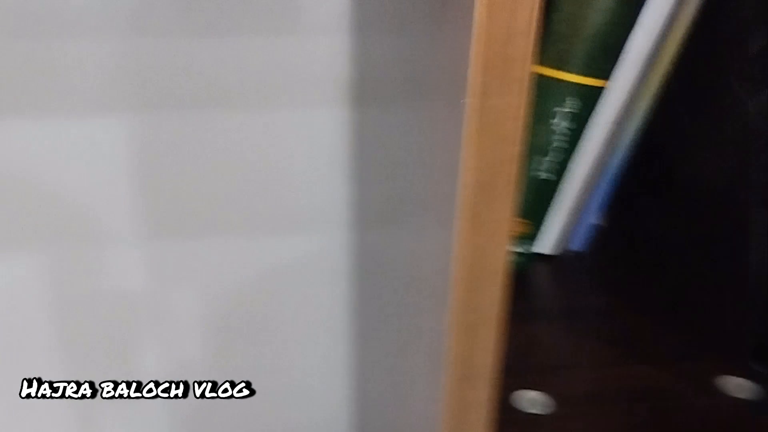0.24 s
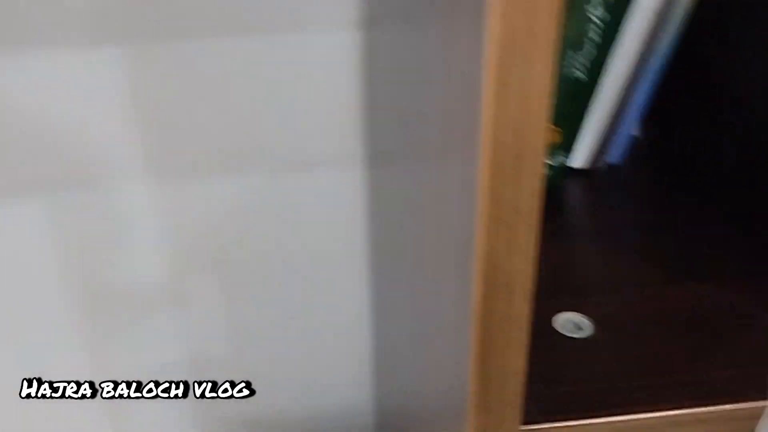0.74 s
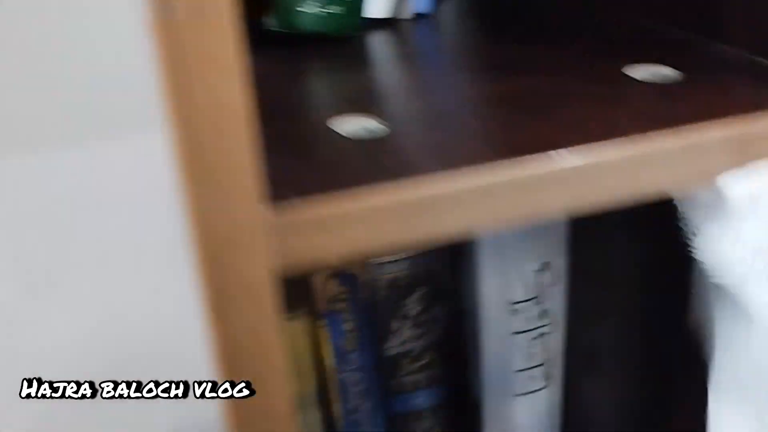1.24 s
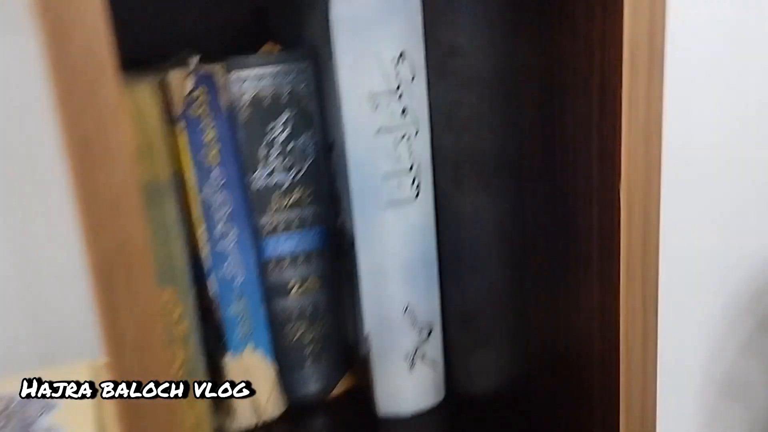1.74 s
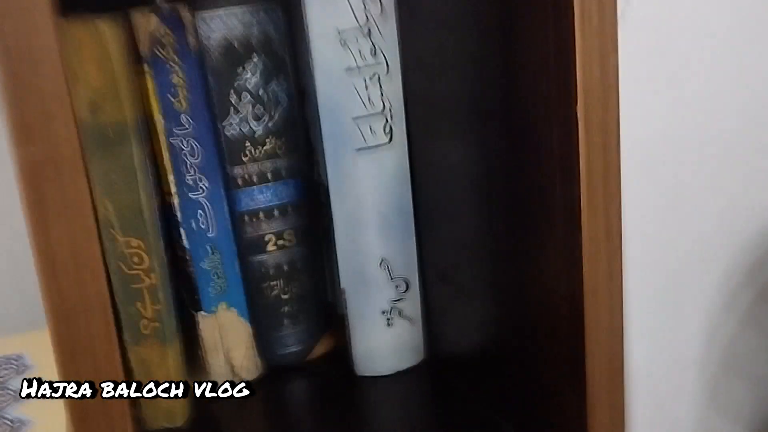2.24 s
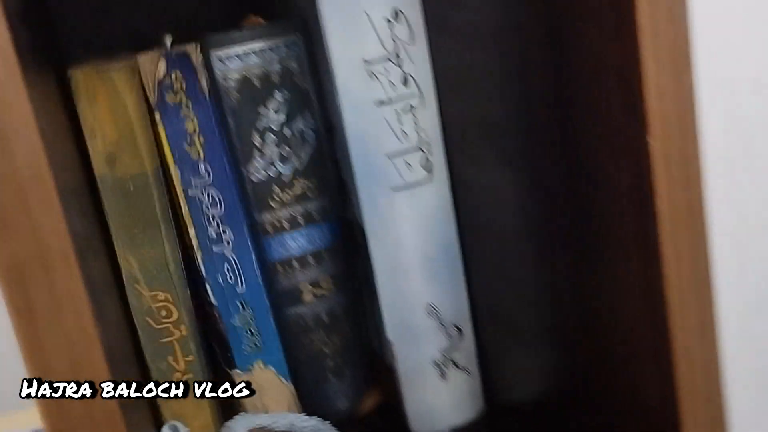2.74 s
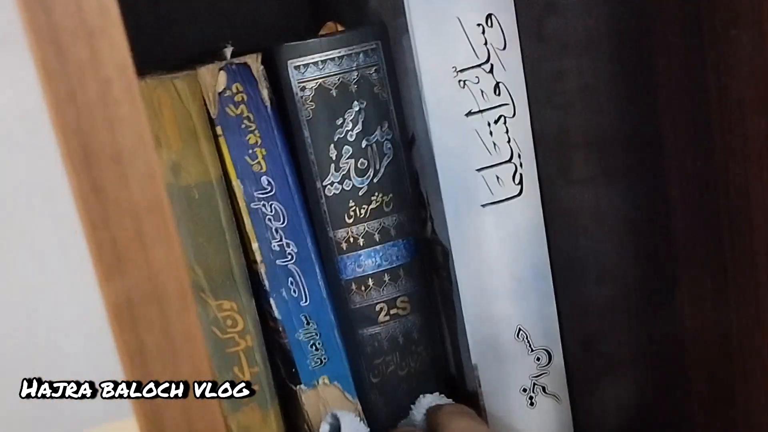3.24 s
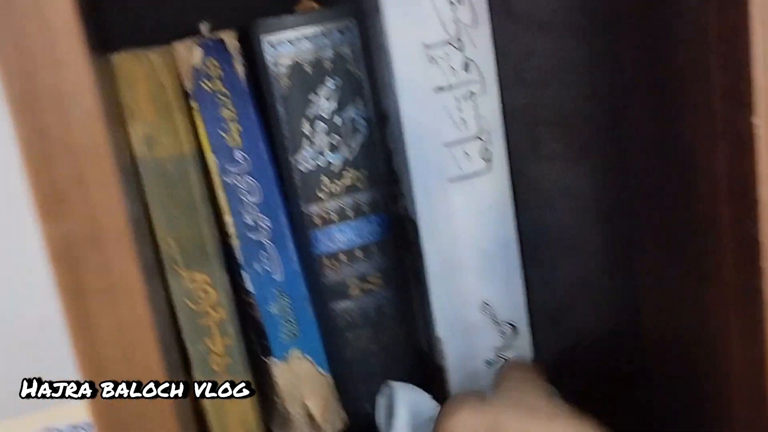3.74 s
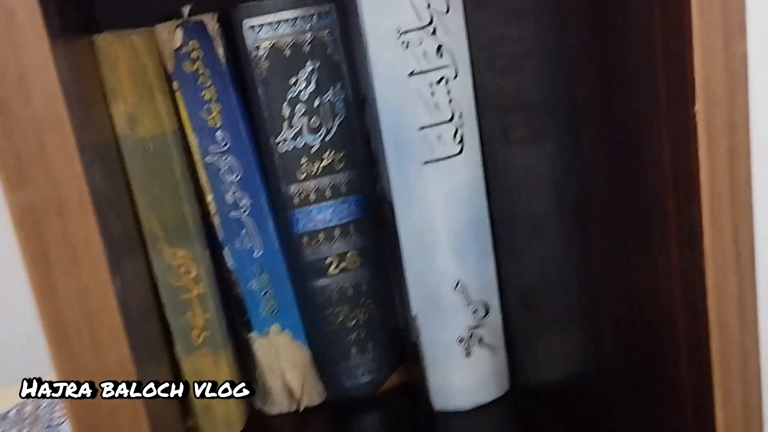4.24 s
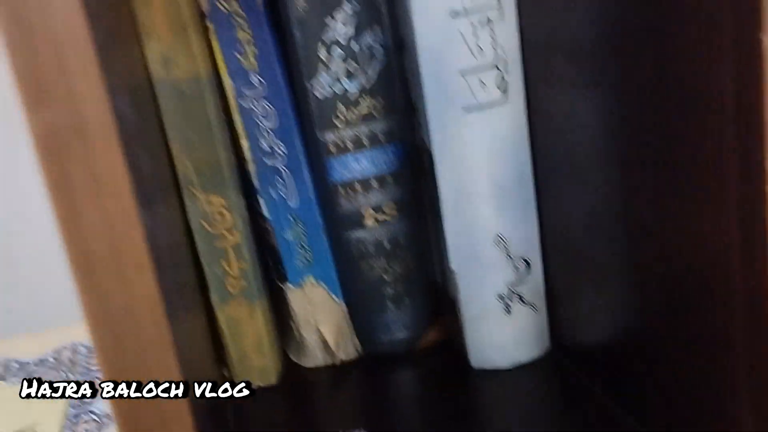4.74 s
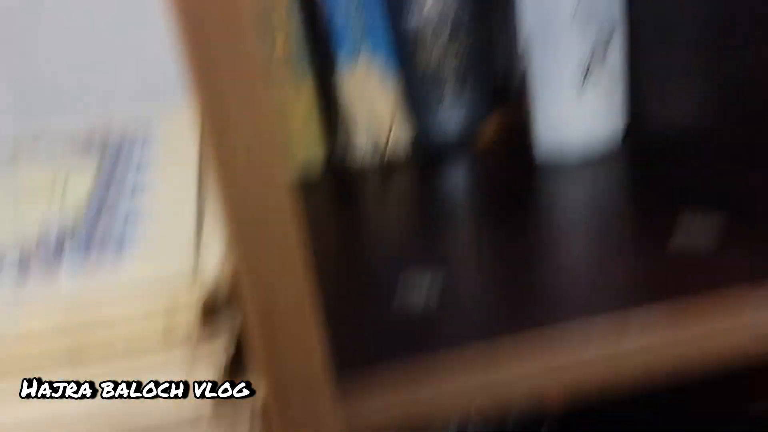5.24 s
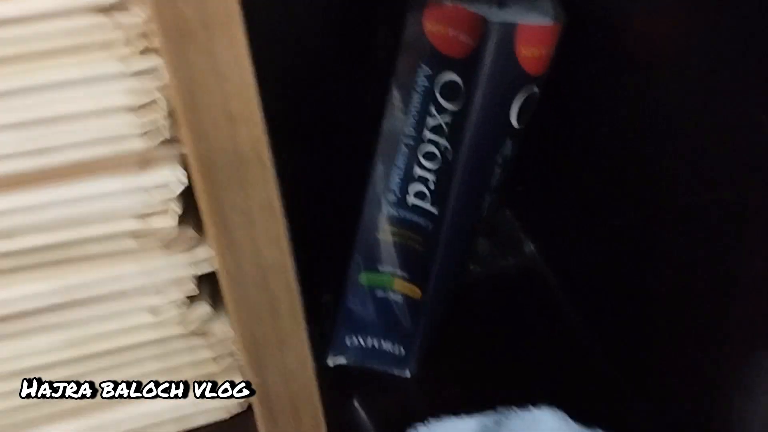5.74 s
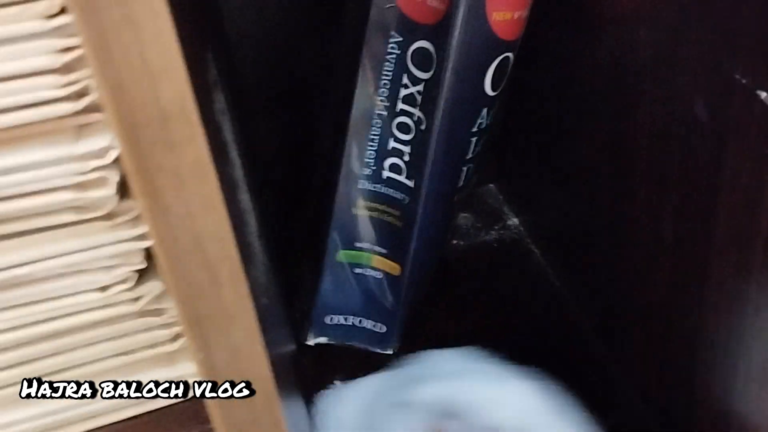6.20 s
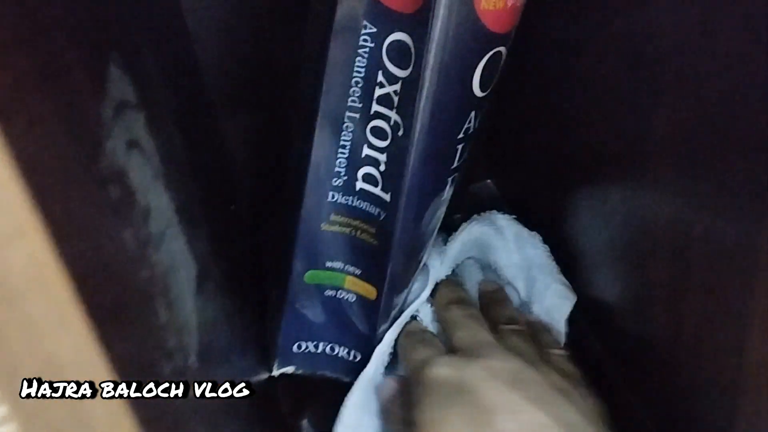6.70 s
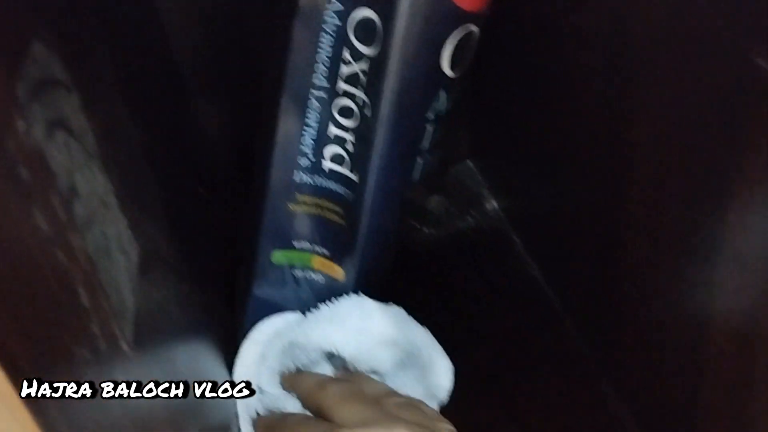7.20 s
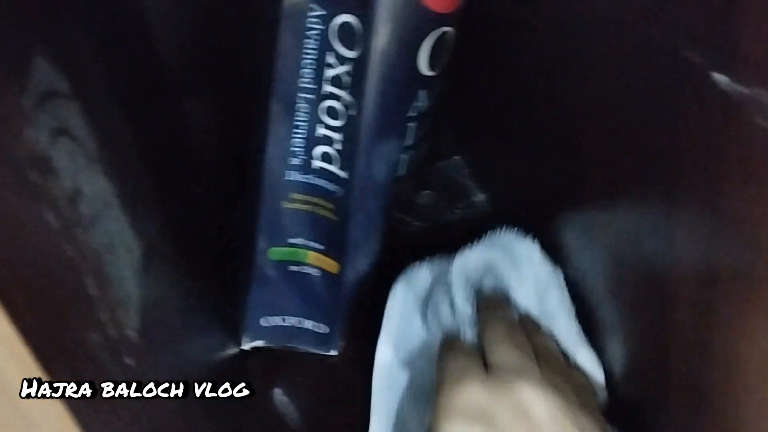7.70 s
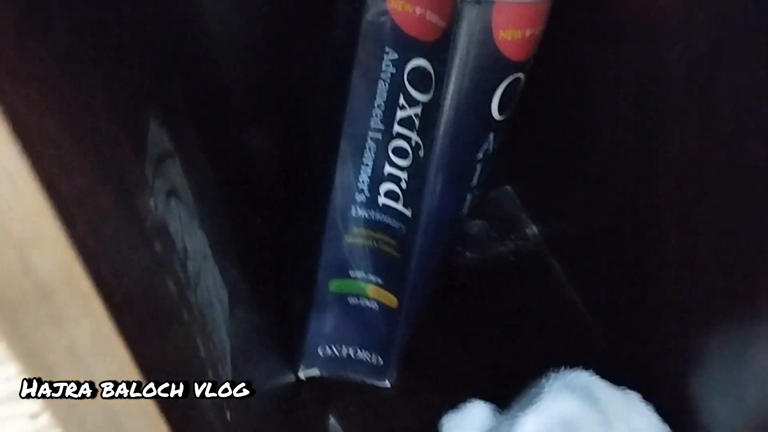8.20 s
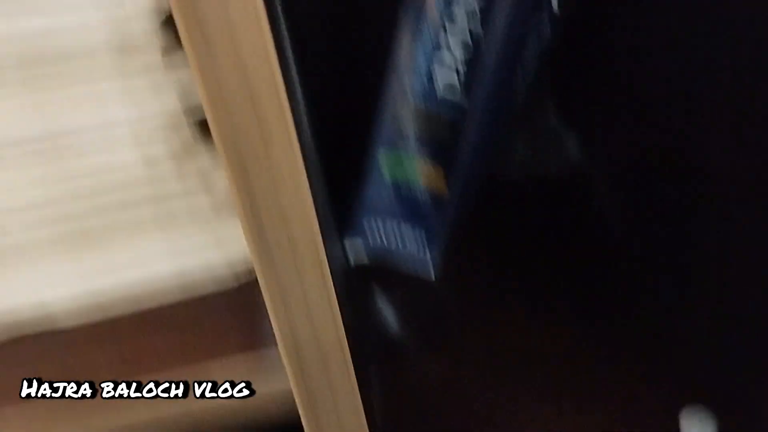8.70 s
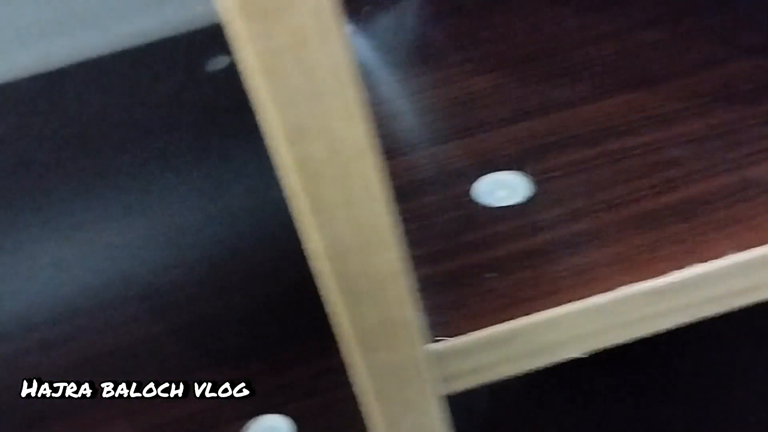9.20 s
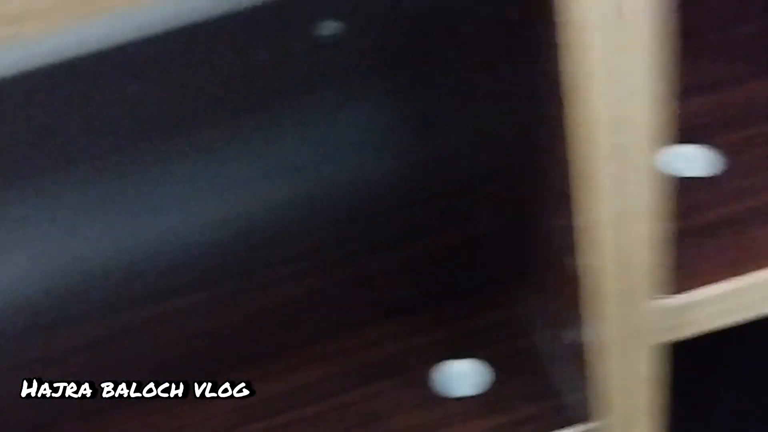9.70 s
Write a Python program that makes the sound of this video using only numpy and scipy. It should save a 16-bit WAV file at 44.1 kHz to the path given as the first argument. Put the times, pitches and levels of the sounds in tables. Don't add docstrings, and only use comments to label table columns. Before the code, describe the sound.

A cabinet door slaps twice in the first second, with a steel catch snapping, then knuckles hit a wooden side panel very hard. After that a cloth wipes the shelves in short, uneven hissing strokes, with soft padded thuds and faint knocks. Close hand-held phone in a small quiet room, low rumble and small air puffs on the microphone.

```python
import sys
import numpy as np
from scipy import signal
from scipy.fft import rfft, irfft, next_fast_len
from scipy.io import wavfile
from scipy.ndimage import uniform_filter1d, map_coordinates

SR = 44100
rng = np.random.default_rng(int(sys.argv[2]) if len(sys.argv) > 2 else 0)


def boost(x):
    u = np.asarray(x, float) / 20
    return 10 ** u


def master_out(mix):
    frames = np.transpose(np.atleast_2d(mix))
    ceiling = np.clip(frames, -1, 1)
    pcm = np.round(ceiling * 32767).astype(np.int16)
    wavfile.write(sys.argv[1], SR, pcm)


N = 438794


def unit(x):
    return x / np.sqrt(np.mean(x ** 2) + 1e-20)


def along(points, hz):
    f, v = np.transpose(points)
    return np.interp(np.log(hz + 1), np.log(f + 1), v)


def wobble(rate, order=3):
    knots = rng.standard_normal(int(N * rate / SR) + 4)
    return map_coordinates(knots, [np.arange(N) * rate / SR], order=order)


def filtered(x, response):
    n = x.shape[-1]
    m = next_fast_len(n + 8192)
    return irfft(rfft(x, m) * response(np.fft.rfftfreq(m, 1 / SR)), m)[..., :n]


def resonance(f, centre, width):
    return 1j * f * width / (centre * centre - f * f + 1j * f * width)


def split_angle(alike, hz):
    return np.arccos(np.clip(along(alike, hz), -1, 1)) / 2


def rush(spectrum, alike, patchy_db, grit_db=0):
    raw = rng.standard_normal((2, N)) * boost(grit_db * wobble(970, order=1))
    z = signal.stft(raw, nperseg=512)[2]
    field = rng.standard_normal(z.shape[1:])
    for axis in (0, 1):
        field = uniform_filter1d(field, size=8, axis=axis)
    pair = signal.istft(z * boost(patchy_db * unit(field)), nperseg=512)[1][:, :N]

    def colour(hz):
        angle = split_angle(alike, hz)
        return boost(along(spectrum, hz)) * [np.cos(angle), np.sin(angle)]

    mid, side = filtered(pair, colour)
    return unit(np.array([mid + side, mid - side]))


def add(track, s, sound):
    i = round(s * SR)
    track[:, i:i + sound.shape[1]] += sound[:, :N - i]


def later(pair, count):
    return np.array([pair[0], np.roll(pair[1], count)])


# (frequency [Hz], time to fall 60 dB [s])
ROOM_DECAY = [(100, 0.32), (500, 0.24), (2000, 0.22), (6000, 0.15), (14000, 0.1)]
# (frequency [Hz], likeness [-1 to 1])
ROOM_ALIKE = [(60, 0.73), (240, 0.81), (950, -0.42), (3770, 0.16), (15000, -0.44)]


def with_room(sound, wet_db):
    hz, t, (a, b) = signal.stft(rng.standard_normal((2, SR // 4)), SR, nperseg=256)
    angle = split_angle(ROOM_ALIKE, hz)[:, None]
    mid, side = np.cos(angle) * a, np.sin(angle) * b
    z = np.array([mid + side, mid - side])
    tail = signal.istft(z * boost(-60 * t / along(ROOM_DECAY, hz)[:, None]), SR, nperseg=256)[1]
    tail *= 1 - np.exp(-np.arange(tail.shape[1]) / SR / 0.0053)
    tail *= np.linspace(1, 0, tail.shape[1])
    wet = signal.fftconvolve(sound, tail / np.linalg.norm(tail[0]), axes=1)
    return np.pad(sound, ((0, 0), (0, tail.shape[1] - 1))) + boost(wet_db) * wet


# (start [s], length [s], first speed
# [dB], last speed [dB], pressure on the board re speed [dB])
FREE_STROKES = [(.11, .13, -68.5, -65, 15), (.282, 0.14, -50.5, -69.5, -1.5), (.45, 0.3, -78.5, -63.5, 4),
                (.778, 0.14, -63, -62, 1), (1.0, 0.13, -69, -66.5, 1), (1.105, 0.047, -60.5, -56, 2),
                (1.2, 0.082, -66.5, -64.5, 13), (1.3, 0.056, -70.5, -61, 17.5), (1.45, 0.35, -66.5, -75, 4),
                (1.67, 0.22, -84, -62, 9), (1.97, 0.29, -67, -71.5, 15), (2.2, 0.25, -76, -66.5, 6.5)]
SHELF_STROKES = [(2.5, 0.19, -60, -60.5, 11.1), (2.708, .025, -55, -54.5, 8.1), (2.74, .03, -59, -58, 6),
                 (2.82, 0.016, -52.5, -58.5, 3.2), (2.782, 0.025, -50.5, -54, 5.2),
                 (2.96, 0.2, -58.5, -72, 5.8), (3.15, 0.088, -71, -83, 3), (3.285, 0.13, -65, -62, 8.8),
                 (3.53, 0.062, -67.5, -62, 6.9), (3.77, 0.24, -68, -56.5, 5.1),
                 (4.15, 0.14, -56.5, -56, 4.1), (4.46, 0.059, -71, -69, 17.3),
                 (4.57, 0.093, -61, -59.5, 5.7), (4.74, 0.095, -57, -57.5, 4.4),
                 (4.95, .11, -68, -58.5, 15.5),
                 (5.56, 0.19, -74, -71.5, 6.3), (5.88, 0.06, -67, -59, 5), (6.02, 0.081, -74, -66.5, 5.4),
                 (6.14, 0.1, -61, -58, 8.1), (6.3, .04, -67.5, -69, 8), (6.376, 0.21, -54.5, -68.5, 8.2),
                 (6.61, 0.051, -61, -56.5, 12.5), (6.72, 0.26, -63.5, -59.5, 7),
                 (7.0, 0.21, -64.5, -65.5, 5.5), (7.29, 0.14, -61, -59, 5.1),
                 (7.449, 0.15, -61.5, -68.5, 6.6), (7.64, 0.13, -60.5, -70.5, 7.7),
                 (7.9, 0.14, -61, -57, 4), (8.08, 0.12, -63.5, -64, 8.3), (8.221, 0.11, -67, -53.5, 7.5),
                 (8.37, 0.057, -58, -56.5, 9.4), (8.58, .17, -73.5, -69.5, 6.4), (8.78, 0.15, -67, -80, 12),
                 (9.0, 0.087, -68, -65, 5.4), (9.1, 0.15, -72, -77.5, 9.1), (9.3, 0.098, -73, -65.5, 14),
                 (9.465, 0.079, -63, -58, 6.1), (9.62, 0.15, -67, -67.5, 5.8),
                 (9.8, 0.097, -64.5, -64, 12.4)]


def strokes():
    start_db_per_s, stop_db_per_s, lifted_db = 201, 350, -89
    nap_free_db, nap_shelf_db, nap_grows = -9, -9, 1.05
    t = np.arange(0, N / SR + .01, .002)
    speed, nap, press = np.full((3, len(t)), float(lifted_db))
    for table, nap_db in (FREE_STROKES, nap_free_db), (SHELF_STROKES, nap_shelf_db):
        for s, length, first_db, last_db, press_db in table:
            db = np.interp(t, [s, s + length], [first_db, last_db])
            db = db - start_db_per_s * np.maximum(s - t, 0)
            db = db - stop_db_per_s * np.maximum(t - s - length, 0)
            speed = np.maximum(speed, db)
            press = np.maximum(press, db + press_db)
            nap = np.maximum(nap, -62 + nap_grows * (db + 63.0) + nap_db)
    return [np.interp(np.arange(N) / SR, t, curve) for curve in (speed, nap, press)]


def panel(modes, damping):
    def response(f):
        return sum(boost(db) * resonance(f, hz, damping * np.log(1000) / np.pi / t60) for hz, db, t60 in modes)

    return response


SHELF_CHANGES = [2.1, 5.3, 9.3]
# (frequency [Hz], level per Hz [dB])
SCRAPE_COLOUR = [(240, -37), (400, -10.5), (590, -6), (721, -4.5), (828, -8.5), (1180, -11), (1900, -11.5),
                 (2400, -13), (5290, -15), (8000, -39.5), (10400, -69), (17600, -120)]
# (frequency [Hz], level per Hz [dB])
NAP_COLOUR = [(3500, -23), (6000, 2.5), (9000, 0), (16000, -10)]
# (frequency [Hz], likeness [-1 to 1])
CLOTH_ALIKE = [(60, .9), (600, 1), (1500, 0.94), (3500, 0.57), (8000, .05), (15000, .05)]
# (frequency [Hz], width [Hz], level [dB])
OVERTONES = [(1290, 48, -1), (1657, 38, -2), (3900, 140, -9)]


def cloth():
    scrape_db, nap_db, drum_db = strokes()
    flutter = wobble(22)

    def overtones(f):
        return 1 + sum(boost(db + 0.5) * resonance(f, hz, width) for hz, width, db in OVERTONES)

    scrape = rush(SCRAPE_COLOUR, CLOTH_ALIKE, patchy_db=1.5, grit_db=1.5)
    scrape *= boost(scrape_db + .7 * flutter) * boost(0.73 * wobble(160, order=1))
    scrape = boost(-1.5) * filtered(scrape, overtones)

    nap = boost(nap_db + .8 * flutter) * rush(NAP_COLOUR, CLOTH_ALIKE, patchy_db=1.0, grit_db=1.0)

    slip_colour = [(60, 2.5), (300, 1.0), (800, -9.0), (1000, -16.0), (2000, -31.5)]  # (Hz, dB)
    slips = rush(slip_colour, [(200, 1.0), (900, 0.32)], patchy_db=4.0) * boost(0.87 * wobble(45))
    place = np.searchsorted(SHELF_CHANGES, np.arange(N) / SR)
    panels = [panel(FRAME_MODES[1:], damping=1.9), panel(UPPER_MODES[1:], damping=1.0),
              panel(LOWER_MODES[1:], damping=2.3), panel(FRAME_MODES[1:], damping=2.9)]
    boards = np.zeros((2, N))
    for k, response in enumerate(panels):
        here = place == k
        boards += unit(filtered(slips * here, response)) * np.sqrt(np.mean(here))
    return scrape + nap + boost(drum_db - 2.5) * boards


def sweeping(pair, samples):
    late = np.round(samples * np.tanh(1.2 * wobble(2.2))).astype(int)
    return np.array([pair[0], pair[1][np.clip(np.arange(N) - late, 0, N - 1)]])


def knocks(table, modes, colour, wet_db, crack_s, scuff, lag_s, pan_db, count):
    out, t = np.zeros((2, N)), np.arange(SR // 7) / SR
    for s, db, over_db, crack_db, carcass_db in table:
        ring = np.zeros(len(t))
        for hz, level, t60 in modes:
            part_db = carcass_db if hz < 170 else 0 if hz < 420 else over_db
            pitch = hz * (1 + 0.017 * rng.normal())
            build = 1 - np.exp(-t * hz / 0.85)
            ring += boost(part_db + level - 60 * t / t60) * np.sin(2 * np.pi * pitch * t) * build
        shared, *own = filtered(rng.standard_normal((3, len(t))), lambda f: boost(along(colour, f)))
        fade = boost(-60 * t / crack_s) + scuff * boost(-60 * t / 0.077)
        crack = (shared + 1.1 * np.array(own)) * fade
        crack *= boost(crack_db + 5.0) / np.abs(crack).max()
        pan = pan_db * np.array([[.5], [-.5]])
        add(out, s + lag_s, with_room(boost(db - 5.5 + pan) * (ring + crack), wet_db))
    return later(out, count)


# (time [s], board peak level [dB],
# overtones re board [dB], # crack re board [dB], carcass re board [dB])
DOOR_KNOCKS = [(.073, -40, -23, -36, 3), (.187, -18, -20, -29.5, 3), (.2005, -17, 7.5, -6.5, -15.5),
               (.2065, -12, 0, 4, -8), (.713, -25.5, -11.5, -29, 8), (.764, -16, 0, -9, 14),
               (.768, -13.5, -6.5, -3, 0.5), (.775, -27, 0, -1.5, -1), (.786, -22.5, -6, -16, -1),
               (.8065, -7, -4.5, -6, 3), (.81, -4.5, -13, -15, 4), (.826, -16.5, -8.5, -20.5, 2),
               (1.344, -24, -11.5, -29, -0.5)]
# (frequency [Hz], level [dB], time to fall 60 dB [s])
DOOR_MODES = [(137, 6, 0.034), (127, -10.5, 0.13), (250, -5.5, 0.076), (300, 4, 0.028), (468, 1.5, 0.04),
              (770, -2.5, 0.02), (980, -8.5, .03), (1190, -14, 0.022), (2460, -19, 0.019)]
# (frequency [Hz], level [dB])
SLAP_COLOUR = [(300, -26.5), (800, -7), (1600, -12.5), (2400, -15), (3200, -10.5), (5200, -17), (8000, -18),
               (17000, -36)]


def door_knocks():
    return knocks(DOOR_KNOCKS, DOOR_MODES, SLAP_COLOUR, wet_db=-12.0, crack_s=0.028, scuff=0.13,
                  lag_s=0.001, pan_db=-2.5, count=-2)


# (time [s], board peak level [dB], overtones re board [dB],
# crack re board [dB], carcass re board [dB])
SIDE_KNOCKS = [
    (1.357, -37, -5, -2.5, -6.5),
    (1.3715, -20.5, -2, -11, -9),
    (1.376, -1, -15, -17, -15),
    (1.388, -16.5, 7.5, -8.5, -23),
    (1.419, -26.5, 1, -12, -3),
]
# (frequency [Hz], level [dB], time to fall 60 dB [s])
SIDE_MODES = [(154, -7, 0.12), (240, -4.5, .13), (268, -0.5, .07), (495, -7.5, 0.04), (745, -4, 0.05),
              (822, -17, 0.036), (940, -28, .04), (1127, -23, 0.032), (1594, -20, 0.019), (2830, -20, .02)]
# (frequency [Hz], level [dB])
RAP_COLOUR = [(300, -17), (700, 2), (1600, -7.5), (2800, -10.5), (5000, -14), (9000, -24), (17000, -43)]


def side_knocks():
    return knocks(SIDE_KNOCKS, SIDE_MODES, RAP_COLOUR, wet_db=-12.5, crack_s=0.023, scuff=0.33,
                  lag_s=.0006, pan_db=1.0, count=-4)


# (time [s], board peak level [dB], overtones re board [dB],
# crack re board [dB], carcass re board [dB])
UPPER_KNOCKS = [(2.467, -35, -22, -30, -15), (2.493, -28, -12.5, -11, -16), (2.706, -41.5, 3, -8, -14),
                (2.777, -42, 9, -15, -6), (2.796, -31.5, 2, -8, -4), (2.953, -52, 4, -5, -10),
                (4.24, -32, -8, -11, -7), (4.408, -60, 2, -2, -10), (4.452, -57, 4, -15, -12),
                (4.503, -38.5, -11, -13, -22), (4.569, -38, -23, -15, -14), (4.75, -31.5, -12, -18, -9),
                (4.803, -33, -14, -13, -24), (4.999, -36.5, -12, -12, -1), (5.022, -38, -21, -31, -12.5)]
# (frequency [Hz], level [dB], time to fall 60 dB [s])
UPPER_MODES = [(106, 0.5, 0.1), (196, -8.5, 0.089), (295, 4.5, 0.049), (305, -7.5, 0.017),
               (507, -2.5, 0.066), (735, 5, 0.04), (1230, -5, 0.018)]


def upper_knocks():
    return knocks(UPPER_KNOCKS, UPPER_MODES, RAP_COLOUR, wet_db=-9.0, crack_s=0.034, scuff=.2,
                  lag_s=0.00027, pan_db=1.0, count=5)


# (time [s], board peak level [dB], overtones re board [dB],
# crack re board [dB], carcass re board [dB])
LOWER_KNOCKS = [(5.6, -29, -17, -24, -1), (5.622, -27, 1, -10, 2), (5.644, -27.5, -6, -16, 2.5),
                (6.174, -30, -25, -17, -26), (6.371, -33.5, -23, -22, 3.5), (6.604, -50, 0, 0, -18),
                (6.626, -42, 2, 1.5, -17.5), (6.648, -43, 4, 4.5, -18), (6.964, -41, 1, -25, -12),
                (7.5525, -28, -7, -5, 0.5), (7.56, -35.5, 6, -16, -1), (7.5715, -28, -20, -29, -12),
                (7.665, -49, 9, 2, 4), (8.369, -42, 6, -2, -20), (8.443, -40, -2, -8, -17)]
# (frequency [Hz], level [dB], time to fall 60 dB [s])
LOWER_MODES = [(155, 1.5, 0.083), (236, -6.5, 0.11), (257, 0, 0.068), (490, -4.5, 0.032), (716, -6, 0.038),
               (1130, -16, 0.036)]


def lower_knocks():
    return knocks(LOWER_KNOCKS, LOWER_MODES, RAP_COLOUR, wet_db=-11.0, crack_s=0.029, scuff=0.85,
                  lag_s=.0006, pan_db=1.5, count=4)


# (time [s], board peak level [dB], overtones re board [dB],
# crack re board [dB], carcass re board [dB])
FRAME_KNOCKS = [
    (2.185, -44.5, 5.5, -2.5, -5.5),
    (2.839, -33.5, -10, -22, 4),
    (3.585, -32, -31, -27.5, 12.5),
    (8.744, -26.5, -13, -28, -1),
    (8.763, -26, -14, -27, 3),
    (8.788, -39, -2, -15, 8),
    (9.26, -48, 0, -19, 8),
    (9.323, -44, 4, -12, -10),
    (9.375, -36, -23, -17.5, 5),
    (9.888, -31.5, -17, -33, -13.5),
]
# (frequency [Hz], level [dB], time to fall 60 dB [s])
FRAME_MODES = [(153.5, -1.5, 0.046), (181, -7, 0.16), (334, 5, 0.017), (430, 9, 0.034), (620, 1, 0.065),
               (900, 2, 0.012)]


def frame_knocks():
    return knocks(FRAME_KNOCKS, FRAME_MODES, RAP_COLOUR, wet_db=-12.5, crack_s=0.024, scuff=.21,
                  lag_s=0.00054, pan_db=0.0, count=-5)


# (frequency [Hz], level [dB], time to fall 60 dB [s])
CATCH_MODES = [(3200, 2.5, 0.0042), (4090, -4.5, 0.005), (5080, 1, 0.0046), (2140, -6, 0.0074),
               (840, -7, 0.014)]


def catch():
    out, t = np.zeros((2, N)), np.arange(SR // 30) / SR
    ring = sum(boost(db - 60 * t / t60) * np.sin(2 * np.pi * hz * t) for hz, db, t60 in CATCH_MODES)
    level_db = -8.5 + np.array([[-2.5], [2.5]])
    add(out, .2078, with_room(boost(level_db) * ring, wet_db=-20.5))
    return later(out, count=-1)


# (start [s], length [s], peak level [dB], pitch [Hz])
THUDS = [(1.9895, 0.022, -27, 284), (2.009, 0.023, -33.5, 250), (2.035, 0.0097, -37, 222),
         (2.539, 0.032, -39.5, 320), (2.586, 0.03, -39.5, 330), (2.619, 0.021, -42.5, 317),
         (2.646, 0.021, -43, 323), (2.693, 0.011, -45, 300), (5.6235, 0.014, -18.5, 250),
         (5.637, 0.018, -26, 235), (5.652, 0.022, -34, 244), (5.699, 0.012, -48, 250),
         (5.727, 0.0076, -40, 200), (6.424, 0.022, -44, 250), (6.63, 0.0072, -39, 250),
         (6.643, .012, -42, 250), (6.673, 0.018, -39, 230), (7.414, 0.024, -45, 250),
         (7.915, .02, -48.5, 250), (8.272, 0.018, -48, 250), (8.367, 0.021, -29, 258),
         (8.433, 0.033, -29, 255), (9.4, 0.029, -42.5, 128.5), (4.16, 0.02, -44.5, 300),
         (4.479, 0.015, -49, 300), (7.569, 0.02, -35, 112), (7.585, .03, -42, 240),
         (8.763, 0.016, -36, 110), (0.314, 0.032, -42.5, 199), (1.372, .007, -15.5, 230),
         (1.399, .024, -21.5, 258), (5.914, 0.019, -49.5, 250), (6.059, 0.022, -53, 250),
         (7.088, 0.017, -48.5, 250), (3.432, 0.019, -51.5, 300), (3.863, 0.018, -49, 300),
         (2.968, 0.017, -48.5, 300), (.764, .012, -18.5, 401), (0.767, .02, -29, 1010),
         (.808, 0.015, -25, 818), (0.81, 0.016, -27, 596), (.83, 0.016, -23, 120), (1.432, .07, -36, 245),
         (7.5525, .005, -30, 230), (.925, .04, -41, 150), (.872, .04, -33, 125), (2.186, .006, -48, 750),
         (2.055, .012, -38, 170)]


def thuds():
    out = np.zeros((2, N))
    for s, length, db, hz in THUDS:
        t = np.arange(round(length * SR)) / SR
        swell = np.sin(np.pi * (t / length) ** 0.94)
        tone = swell * np.sin(2 * np.pi * hz * t)
        add(out, s, with_room(boost(db) * np.array([tone, tone]), wet_db=-11.5))
    return out


def swells(table, width):
    out = np.zeros((2, N))
    for s, length, db, hz in table:
        swell = np.sqrt(np.hanning(round(length * SR)))
        noise = rng.standard_normal((2, len(swell)))
        air = filtered(noise, lambda f: np.abs(resonance(f, hz, hz * width)) ** 2)
        add(out, s, boost(db) * unit(air) * swell)
    return out


# (start [s], length [s], rms level [dB], centre [Hz])
SWISHES = [(7.661, .025, -58, 1020), (1.2, 0.12, -63.5, 4500), (1.17, 0.17, -65, 2400),
           (2.49, 0.04, -48, 340), (.221, .04, -40.5, 600), (.3, .07, -68, 2300), (1.4, .06, -44, 520),
           (0.77, .14, -48, 320), (1.015, .05, -63, 1040), (1.015, .06, -68, 2300),
           (1.2, 0.067, -67.5, 5600), (1.1, .07, -65.5, 2400), (2.7, 0.055, -57, 6300),
           (6.62, .05, -63, 3700), (8.56, .07, -73, 1700), (2.94, 0.039, -58.5, 1670),
           (2.699, 0.037, -51.5, 1200), (2.776, 0.016, -37.5, 710), (5.032, 0.044, -37.5, 300),
           (5.726, 0.0081, -62, 4800), (8.994, 0.081, -64, 980), (9.321, 0.012, -47, 650),
           (9.801, 0.061, -61, 970), (5, 0.085, -61, 750)]


def swishes():
    return swells(SWISHES, width=0.36)


# (start [s], length [s], rms level [dB], centre [Hz])
BUZZES = [(.3, .095, -62, 2230), (.232, .045, -50, 2400), (1.4, 0.012, -52, 1300), (2.71, 0.045, -63, 1800),
          (2.8, .035, -59.5, 1920), (2.54, 0.055, -58, 750), (7.553, .014, -56, 2080),
          (7.556, .014, -51, 583), (1.415, .03, -47, 830), (1.43, .07, -55, 560), (1.372, .014, -42, 1600),
          (2.5, .19, -50, 330), (8.42, .045, -63, 1480), (8.44, .022, -55, 640), (4.14, .19, -58, 750),
          (4.57, .11, -56, 750), (4.71, .07, -57, 755), (3.28, .15, -60, 745), (3.82, .2, -60, 745),
          (4.238, .02, -56, 1310), (6.62, .06, -57, 520)]


def buzzes():
    return swells(BUZZES, width=0.077)


def bursts(table, t60):
    out, t = np.zeros((2, N)), np.arange(SR // 50) / SR
    for s, db in table:
        noise = rng.standard_normal((2, len(t))) * boost(-60 * t / t60)
        burst = filtered(noise, lambda f: 1j * f / (1300 + 1j * f) / (1 + 1j * f / 8000))
        add(out, s, boost(db) * burst / np.abs(burst).max())
    return out


# (time [s], peak level [dB])
SNAPS = [
    (7.197, -38),
    (7.2015, -35),
]


def snaps():
    return bursts(SNAPS, t60=.016)


# (time [s], peak level [dB])
FLICKS = [
    (.7675, -26),
    (.778, -36),
    (7.181, -56),
    (7.133, -54),
    (5.6225, -52),
]


def flicks():
    return bursts(FLICKS, t60=.012)


# (time [s], peak level [dB], centre [Hz])
TICKS = [
    (0.141, -42.5, 1880),
    (1.492, -46.5, 3200),
    (1.5296, -60, 3210),
    (1.551, -53.5, 3800),
    (1.6074, -52, 3440),
    (1.7183, -55.5, 2460),
    (1.8847, -49, 3670),
    (1.9915, -46, 2800),
    (3.768, -54, 4500),
    (4.96, -54, 5500),
]


def ticks():
    out, t = np.zeros((2, N)), np.arange(SR // 30) / SR
    for s, db, hz in TICKS:
        click = rng.standard_normal((2, len(t))) * boost(-60 * t / .02)
        click = filtered(click, lambda f: resonance(f, hz, hz * 0.59) / (1 + (f / 7000) ** 4))
        add(out, s, with_room(boost(db + 2.5) * click / np.abs(click).max(), wet_db=-9.5))
    return out


# (start [s], length [s], right peak level [dB], left share [0 to 1],
# direction [1 sucks first, -1 pushes first])
PUFFS = [(.972, .03, -33, .5, 1), (.074, .02, -34, .3, 1), (.1325, .008, -31, .2, 1),
         (.1, .022, -40, .5, 1), (0.128, 0.052, -22.5, 0.079, 1), (0.17, 0.036, -26, .13, 1),
         (0.704, 0.05, -15.5, 0.08, 1), (0.766, 0.024, -22, .14, -1), (1.333, 0.025, -27.5, 0.76, -1),
         (2.836, 0.0166, -35.5, .8, 1), (7.645, 0.021, -37, 0.77, 1), (9.526, 0.034, -34, 0.91, -1)]


def puffs():
    out = np.zeros((2, N))
    for s, length, db, left, way in PUFFS:
        u = np.linspace(0, 1, round(length * SR))
        swing = np.sin(2 * np.pi * u) * np.sqrt(np.sin(np.pi * u) + 1e-9)
        add(out, s, -np.sign(way) * boost(db) * swing * [[left], [1]])
    return out


# (frequency [Hz], level per Hz [dB])
ROOM_TONE = [(15, -48.5), (34, -14), (42, 0.5), (72, -4), (107, -12), (168, -17), (270, -22.5), (400, -25),
             (590, -33.5), (1300, -40), (2600, -45), (6000, -51.5), (9000, -53.5), (17000, -64.5)]


def room_tone():
    return boost(-51.5 + 1.2 * wobble(2.5)) * rush(ROOM_TONE, ROOM_ALIKE, patchy_db=1.0)


def scene():
    mix = sweeping(cloth(), samples=6)
    mix += door_knocks() + side_knocks() + upper_knocks() + lower_knocks() + frame_knocks()
    mix += catch() + thuds() + swishes() + buzzes()
    mix += snaps() + flicks() + ticks() + puffs()
    return mix + room_tone()


def band_limit(x):
    return signal.sosfilt(signal.butter(12, 17180, fs=SR, output="sos"), x)


# (frequency [Hz], level [dB])
TREBLE_COLOUR = [(6000, 1.5), (7250, -2), (8230, -6), (9700, 2), (11100, -3.5), (11800, 5.5), (13600, 10),
                 (15100, 15.5), (15850, 3.5), (15960, -48), (16300, -100)]


def record(dry):
    heard = filtered(dry, lambda hz: boost(along(TREBLE_COLOUR, hz)))
    heard /= (1 + np.abs(heard / .85) ** 6) ** (1 / 6)
    return band_limit(heard)


dry = scene()
out = record(dry)
master_out(out)
```